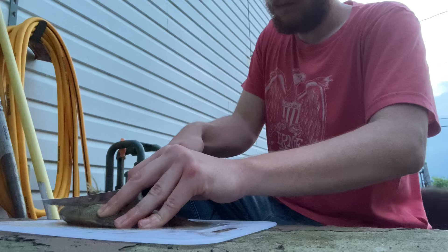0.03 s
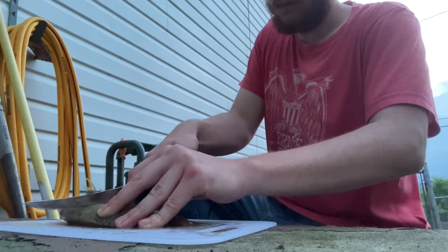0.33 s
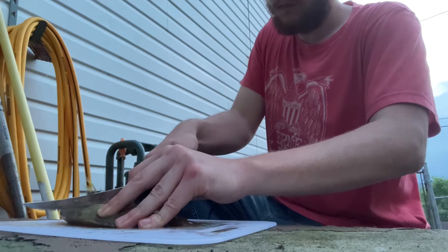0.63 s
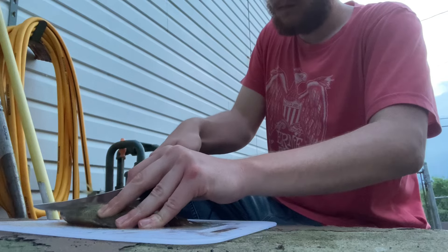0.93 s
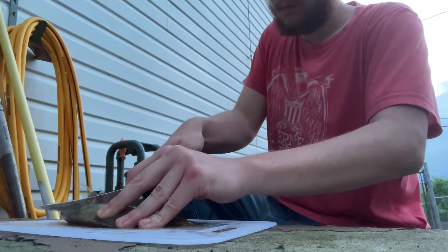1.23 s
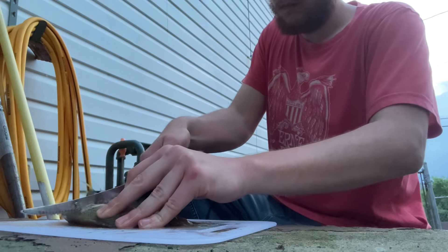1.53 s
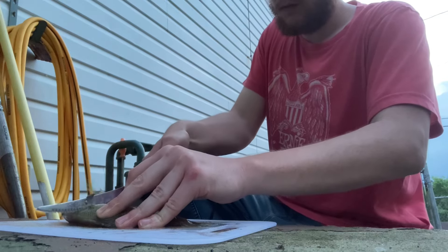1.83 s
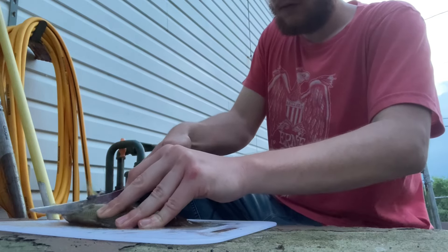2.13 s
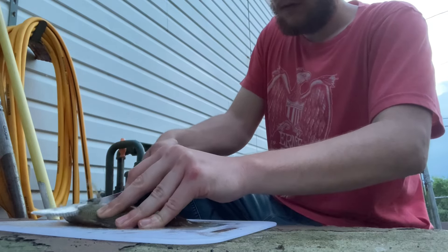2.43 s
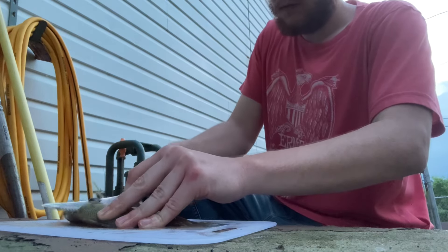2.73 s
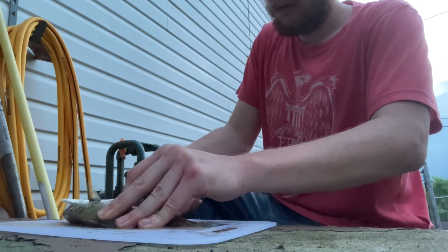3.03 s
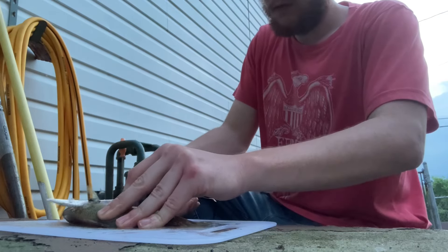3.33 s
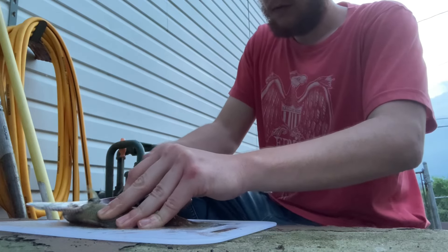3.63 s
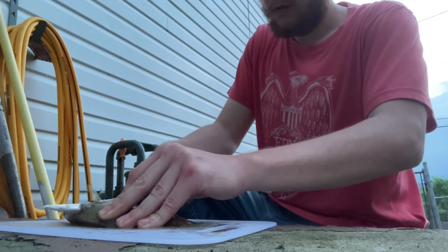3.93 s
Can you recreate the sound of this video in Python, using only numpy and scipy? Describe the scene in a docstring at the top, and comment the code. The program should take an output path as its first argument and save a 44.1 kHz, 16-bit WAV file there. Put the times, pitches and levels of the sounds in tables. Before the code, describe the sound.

An electric knife buzzes and clatters through a fish, winding down briefly and starting again.

```python
"""Electric fillet knife outdoors

An electric knife saws through a fish on a table by a house wall, close to a small stereo microphone.
Its two blades clack at each end of the stroke and now and then snap hard, the gears rattle and the
motor hums; the trigger is let go twice, and the knife coasts and spins up again. Three bumps excite
the modes of the table, and a small bird chirps over faint outdoor rumble."""
import sys
import numpy as np
from scipy import signal
from scipy.fft import rfft, irfft
from scipy.io import wavfile
from scipy.ndimage import uniform_filter1d

SR = 44100
rng = np.random.default_rng(int(sys.argv[2]) if len(sys.argv) > 2 else 0)


def transcribe(signal):
    """Save signal, clipped to [-1, 1], as a 16-bit WAV file at the path in sys.argv[1]."""
    frames = np.atleast_2d(signal).T
    limited = np.clip(frames, -1, 1)
    pcm = np.round(limited * 32767).astype(np.int16)
    wavfile.write(sys.argv[1], SR, pcm)


N = 176400
T = np.arange(N) / SR

# state of the cut: time_s, rattle_db, free_ring_db, slap_ms
CUT_STATE = [(0, -33, 4, 1.5), (.8, -35, 2.5, 1.1), (1.35, -33.5, 2.5, 1.55), (1.8, -34.5, -1.5, 1.1),
             (2.3, -32, 1.5, 1.38), (2.75, -34, -2.5, 2.12), (3.15, -36.5, -9.5, 2.3), (3.55, -34, -4.5, 2),
             (4, -35.5, -10, 1.95)]
# modes of the blades in their mount: pitch_hz, width_hz, level_db
BLADE_MODES = [(1046, 170, -3), (1595, 150, -2), (4400, 200, -11), (4580, 150, 5), (4990, 194, 10)]


def amp(db):
    """Decibels to amplitude ratio."""
    return 10 ** (np.asarray(db) / 20)


def curve(table, col, t=T):
    """Linear interpolation of a table column at times t."""
    rows = np.array(table, float)
    return np.interp(t, rows[:, 0], rows[:, col])


def spectrum(table, hz):
    """Interpolation of a table on a log-frequency axis."""
    rows = np.array(table, float)
    return np.interp(np.log(hz + 1e-9), np.log(rows[:, 0]), rows[:, 1])


def unit(x):
    """Normalisation to rms 1."""
    return x / np.sqrt(np.mean(x ** 2))


def through(x, response):
    """Convolution with an impulse response scaled to unit energy."""
    return signal.fftconvolve(x, response / np.sqrt(np.sum(response ** 2)))[:N]


def colour(*tables, size=8192):
    """Minimum-phase impulse response of filters in cascade: their decibel curves add."""
    hz = np.arange(size // 2 + 1) * SR / size
    cepstrum = irfft(np.log(amp(sum(spectrum(table, hz) for table in tables))))
    causal = 2 * cepstrum[:size // 2] * (np.arange(size // 2) > 0)
    return irfft(np.exp(rfft(causal, size)))


def ring(hz, width_hz):
    """Impulse response of a damped oscillator: the wider the resonance, the faster the decay."""
    t = T[:SR // 4]
    return np.exp(-np.pi * width_hz * t) * np.sin(2 * np.pi * hz * t)


def modes(table):
    """Modal superposition: a struck body rings as a sum of damped oscillators."""
    return sum(amp(db) * ring(hz, width) for hz, width, db in table)


def add_contact(track, sound, at, lead_s=.0011, size=2048):
    """Superposition: mix in a contact with its mid-buffer onset lead_s ahead of the given time."""
    where = int((at - lead_s) * SR) - size // 2 + np.arange(len(sound))
    inside = (where >= 0) & (where < N)
    track[where[inside]] += sound[inside]


def echoes(x, t60_s, gap_s=0.0012, sway_hz=14):
    """Diffuse reflection: decaying noise responses, unlike at each port, blend as the source sways."""
    t = T[:SR // 4]
    fade = amp(-60 * t / t60_s) * (t > gap_s)
    knots = np.arange(N // 1000)
    out = np.zeros((2, N))
    for port in out:
        shares = [np.interp(T * sway_hz, knots, row) for row in rng.standard_normal((5, len(knots)))]
        for share in shares / np.linalg.norm(shares, axis=0):
            port += share * through(x, fade * rng.standard_normal(len(t)))
    return out


def ports(x, phase_share):
    """Stereo cues: level and phase differences between the two microphone ports."""
    # level difference, left minus right: frequency_hz, difference_db
    balance = [(100, 3), (300, .5), (550, 4), (1000, .5), (1480, -1.5), (1600, -9), (1750, -2), (2100, -5),
               (2300, -.5), (4000, -2.5), (8000, 0)]
    # phase lead of the right port: frequency_hz, lead_rad
    phase = [(700, 0), (1350, .3), (1520, 1.3), (1700, 0), (2100, .1), (2700, 1.2), (3600, 1.2), (4100, 0),
             (5600, -.2), (5850, -4.1), (7500, -4.8), (9600, -6.5), (11400, -9.4), (16000, -15.5)]
    hz = np.arange(N + 1) * SR / (2 * N)
    half = amp(spectrum(balance, hz) / 2) * np.exp(-.5j * phase_share * spectrum(phase, hz))
    return irfft(rfft(x, 2 * N) * np.array([half, 1 / half]))[:, :N]


def air(level_db=-49.5):
    """Partial coherence: low outdoor rumble, mostly common to both ports."""
    # spectral density of the rumble: frequency_hz, relative_db
    rumble = [(20, -13), (40, 6.5), (170, 0), (400, -4), (1000, -8.5), (3000, -22), (8000, -20),
              (16000, -92)]
    common, left, right = (through(rng.standard_normal(N), colour(rumble)) for _ in range(3))
    return amp(level_db) * (common + 0.69 * np.array([left, right]))


def bird(top_hz=8300, end_hz=5900, length_s=.034):
    """Frequency modulation: thin, falling, warbling chirps, heard mostly through their echoes."""
    # chirps: start_s, level_db
    chirps = [(.434, -43), (.778, -44), (.94, -44), (1.445, -43.5), (1.64, -54), (1.781, -45)]
    out = np.zeros(N)
    warble = 1 + .04 * unit(uniform_filter1d(rng.standard_normal(N), size=100))
    for at, db in chirps:
        progress = np.clip((T - at) / length_s, 0, 1)
        hz = (top_hz + (end_hz - top_hz) * progress ** 2) * warble
        out += amp(db) * np.sin(np.pi * progress) * np.sin(2 * np.pi * np.cumsum(hz) / SR)
    return out / 2 + amp(6) * echoes(out, t60_s=.1)


def bumps(attack_s=0.0054):
    """Free vibration: the low, damped modes of the bumped table top give dull thuds."""
    # bumps on the table: start_s, level_db
    impacts = [(1.333, -35), (1.925, -36.5), (3.468, -33)]
    # modes of the table top: pitch_hz, t60_s, level_db
    table_modes = [(72, 0.13, 10.5), (97, 0.1, 14), (115, 0.065, 7)]
    out = np.zeros(N)
    for at, db in impacts:
        age = np.maximum(T - at, 0)
        rise = 1 - np.exp(-age / attack_s)
        for hz, t60, mode_db in table_modes:
            out += amp(db + mode_db - 60 * age / t60) * rise * np.sin(2 * np.pi * hz * age)
    return out / 2


def wall(x, level_db=-3, alike_below_hz=520):
    """Early reflections from table and wall; long wavelengths reach both ports alike."""
    left, right = echoes(x, t60_s=0.024)
    highpass = signal.butter(2, alike_below_hz, "highpass", fs=SR, output="sos")
    side = signal.sosfilt(highpass, left - right)
    return amp(level_db) * np.array([left + right + side, left + right - side]) / 2


def motor_hum(hum_rad, pace):
    """Harmonic tone: a hum near 300 Hz and its octave, following the speed in pitch and level."""
    # hum at full speed, louder as the blades bite: time_s, level_db
    hum = [(0, -52.5), (.8, -53.5), (2.44, -53.5), (2.58, -49), (3.86, -48.5), (4, -58)]
    harmonics = np.sin(hum_rad) + amp(-6) * np.sin(2 * hum_rad)
    return np.sqrt(2) * amp(curve(hum, 1)) * pace ** 2 * harmonics


def contacts(grain_db):
    """Impact noise: dense tiny contacts with log-normally distributed sizes."""
    sizes = np.repeat(rng.standard_normal(N // 16 + 1), 16)[:N]
    return unit(rng.standard_normal(N) * amp(grain_db * sizes))


def gear_rattle(hum_rad, pace, spinup_s=0.012):
    """Amplitude modulation: the rattle pulses at the pitch of the hum and grows with speed."""
    effort = pace + spinup_s * np.maximum(np.gradient(pace, T), 0)  # harder while gathering speed
    pulsing = 1 + 0.44 * np.sin(hum_rad)
    return contacts(grain_db=4.5) * pulsing * amp(curve(CUT_STATE, 1)) * effort ** 1.68


def ticks(decay_s=0.00046):
    """Light impacts: the slack blades touch as they coast down, in exponentially decaying noise."""
    # touches of the blades: start_s, level_db
    touches = [(1.7345, -37), (1.822, -41)]
    envelope = sum(2 * amp(db) * (T > at) * np.exp(-np.abs(T - at) / decay_s) for at, db in touches)
    return contacts(grain_db=4) * envelope


def burst(slap_ms, delay_at_1khz_s=0.002006, evenness=.6, size=2048):
    """Dispersion: one contact chatters from mid-buffer, and bending waves bring its lows late."""
    age_ms = np.maximum(T[:size] - T[size // 2], 0) * 1000
    hz = np.arange(size // 2 + 1) * SR / size
    bending = np.exp(-4j * np.pi * delay_at_1khz_s * np.sqrt(1000 * hz))
    envelope = age_ms / slap_ms * np.exp(1 - 2 * age_ms / slap_ms)
    chatter = rfft(envelope * rng.standard_normal(size))
    flattened = chatter / (np.abs(chatter) + 1e-9) ** evenness
    return 2 * unit(irfft(bending * flattened)) * np.sqrt(np.mean(envelope ** 2))


def clacks(cycles, chatter_db=-2.5, scatter_db=1.6):
    """Backlash: the blades hit the limit of their play at each stroke end. Returns (chatter, pushes)."""
    # strength of the clacks: time_s, out_stroke_db, back_stroke_db
    force = [(0, -21, -25), (.17, -16.5, -20.5), (.42, -20.5, -33), (.55, -16.5, -20.5), (1.16, -17, -18.5),
             (1.28, -22, -17.5), (1.39, -18, -21.5), (1.47, -21.5, -30), (1.7, -28.5, -32.5),
             (1.8, -41.5, -25), (1.88, -15.5, -24), (2.08, -18.5, -20.5), (2.3, -15.5, -20),
             (2.55, -22, -22), (3.05, -26, -24), (3.9, -21.5, -19.5)]
    ends = np.arange(np.ceil(2 * cycles[0]), 2 * cycles[-1])
    chatter, pushes = np.zeros(N), np.zeros(N)
    for end, (harder, later) in zip(ends, rng.standard_normal((len(ends), 2))):
        at = np.interp(end / 2, cycles, T)
        slap_ms = curve(CUT_STATE, 3, at)
        gain = amp(curve(force, 1 + int(end) % 2, at) + scatter_db * harder)
        jitter_s = .0001 + 0.00052 * (slap_ms - 1)  # a long slap comes less punctually
        add_contact(chatter, gain * burst(slap_ms), at + later * jitter_s)
        pushes[int(at * SR)] += gain
    return amp(chatter_db) * chatter, pushes


def snaps(detune=.02, scatter_db=3):
    """Strike position sets the modal mix: the blades catch and snap free, each time at another spot."""
    # hard clacks: start_s, ring_db, sizzle_db
    strikes = [(.611, -18, -31), (.6676, -18, -23), (.723, -18, -25), (.7787, -17, -25), (.9175, -21, -23),
               (.9455, -19, -27), (1.001, -19, -25), (1.0564, -18, -27), (1.1395, -19, -27),
               (1.167, -18, -25), (1.386, -17.5, -32), (1.5245, -27, -42), (1.556, -34, -43),
               (1.588, -26, -38), (1.6675, -33, -45), (1.915, -21, -24), (2.170, -17.5, -29),
               (2.2527, -26, -23), (2.2805, -19, -24), (2.308, -25, -20.5), (2.3364, -21, -24),
               (2.502, -28, -21)]
    # sizzle as the microphone picks it up, with a dip near 11.5 kHz: frequency_hz, relative_db
    sizzle = [(1000, -13), (5000, -3), (8300, 4.5), (11700, -5), (13300, 0), (16000, -14)]
    out, sizzle_response = np.zeros(N), colour(sizzle)
    for at, ring_db, sizzle_db in strikes:
        struck = [(hz * rng.normal(1, detune), width, rng.normal(db, scatter_db))
                  for hz, width, db in BLADE_MODES]
        hit = burst(slap_ms=1.0)
        add_contact(out, amp(ring_db) * through(hit, modes(struck)), at)
        add_contact(out, amp(sizzle_db + 2) * through(hit, sizzle_response), at)
    return out


def knife_timbre(slap, rattle):
    """Source and filter: clacks and rattle take the knife's tone colour as the microphone picks it up."""
    # tone colour at the microphone, with a dip near 11.5 kHz: frequency_hz, relative_db
    timbre = [(60, -13), (220, -11), (400, -1.5), (640, -5.5), (880, 4), (1150, 1.5), (1340, -14.5),
              (1500, 4.5), (1640, 2), (1800, -5), (2080, -2.5), (2260, -9), (2500, -0.5), (2870, -9),
              (3030, -4), (3200, -11.5), (3680, -3), (5000, -3), (5900, -5.5), (9300, -12), (10400, -13.5),
              (11700, -19), (13200, -12), (16000, -24)]
    # brightness of the clacks: frequency_hz, relative_db
    clack_tilt = [(100, -17.5), (500, -0.5), (1500, 2.5), (4500, 0), (9000, 3.5), (15000, 6)]
    # brightness of the rattle: frequency_hz, relative_db
    rattle_tilt = [(100, 5.4), (500, 1.3), (1500, 3.94), (7000, 0.62), (15000, 4.4)]
    return through(slap, colour(timbre, clack_tilt)) + through(rattle, colour(timbre, rattle_tilt))


def blades(slap, rattle, free, ring_db=-12, rasp_db=-10):
    """Resonance under load: free blades ring; sunk into the fish they ring less and their teeth rasp."""
    # modes rasped by the teeth: pitch_hz, width_hz, level_db
    rasp_modes = [(1980, 380, 0), (3680, 160, -5)]
    sunk = np.maximum(1 - free, 0)
    ringing = amp(ring_db) * through(slap * free, modes(BLADE_MODES))
    rasp = amp(rasp_db) * through((slap + rattle) * sunk, modes(rasp_modes))
    return ringing + rasp


def knife(full_speed_hz=36, hum_periods_per_cycle=8.36):
    """Forced vibration: one drive paces the clacks, gears and motor. Returns (clatter, drone)."""
    # speed of the reciprocating blades: time_s, cycle_rate_hz
    drive = [(0.0, 37.07), (0.2, 35.12), (0.32, 26.45), (0.43, 20.27), (0.48, 31.81), (0.58, 35.85),
             (1.21, 36.15), (1.36, 27.33), (1.5, 18.68), (1.66, 11.08), (1.84, 3.47), (1.875, 29.35),
             (1.97, 35.24), (2.15, 35.93), (2.5, 36.55), (2.9, 37.12), (3.3, 36.42), (3.6, 36.73),
             (4.0, 36.59)]
    speed_hz = curve(drive, 1)
    pace = speed_hz / full_speed_hz
    cycles = .71 + np.cumsum(speed_hz) / SR  # starts in mid-stroke
    hum_rad = 2 * np.pi * hum_periods_per_cycle * cycles
    chatter, pushes = clacks(cycles)
    slap = chatter + ticks()
    rattle = gear_rattle(hum_rad, pace)
    free = amp(curve(CUT_STATE, 2))
    clatter = knife_timbre(slap, rattle) + blades(slap, rattle, free) + snaps()
    knock = amp(0.5) * through(pushes * free, ring(hz=423, width_hz=96))  # each clack rocks the handle
    return clatter, knock + motor_hum(hum_rad, pace)


def scene():
    """Superposition of the knife's direct sound, its reflections, the bumps, the air and the bird."""
    clatter, drone = knife()
    direct = ports(clatter + drone, phase_share=1)
    surroundings = ports(wall(clatter) + bumps() + air(), phase_share=0)
    return direct + surroundings + bird()


def record(dry):
    """Band limiting: the recorder cuts the deep bass and the top."""
    low_cut_hz, top_hz = 64, 15800
    thin = signal.sosfilt(signal.butter(2, low_cut_hz, "highpass", fs=SR, output="sos"), dry)
    return signal.sosfilt(signal.ellip(10, .2, 80, top_hz, fs=SR, output="sos"), thin)


dry = scene()
out = record(dry)
transcribe(out)
```